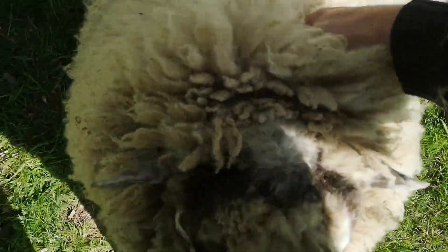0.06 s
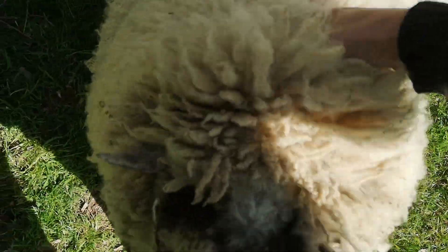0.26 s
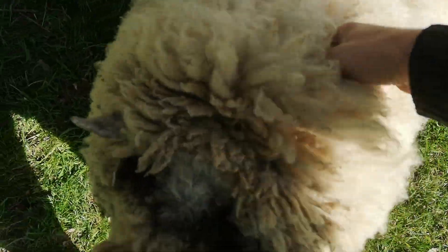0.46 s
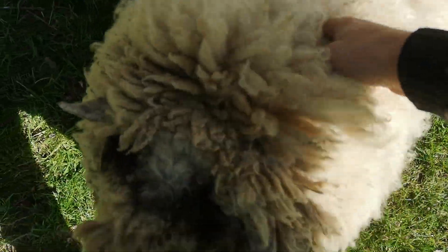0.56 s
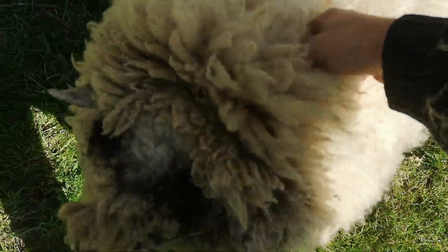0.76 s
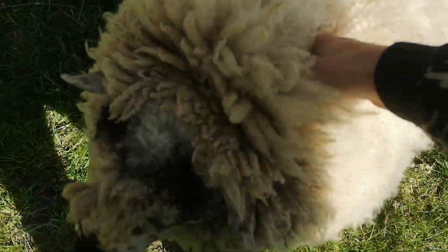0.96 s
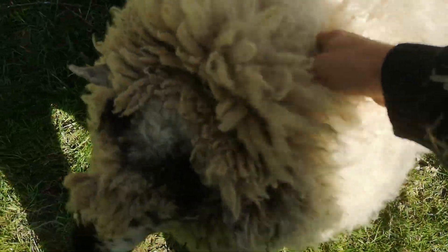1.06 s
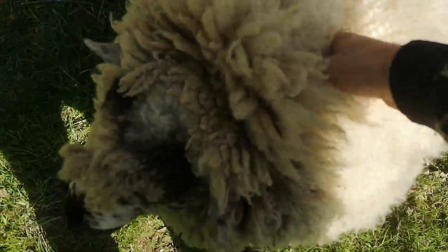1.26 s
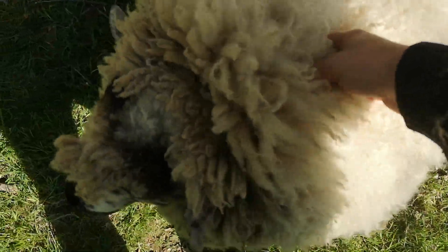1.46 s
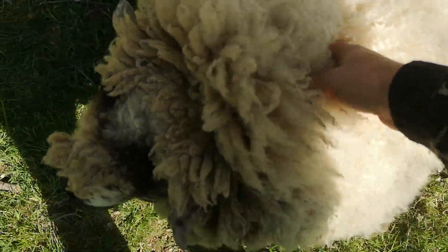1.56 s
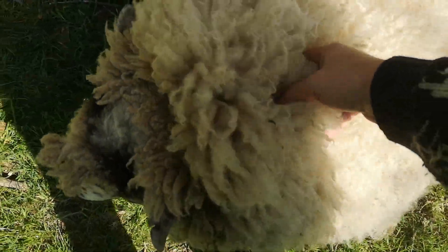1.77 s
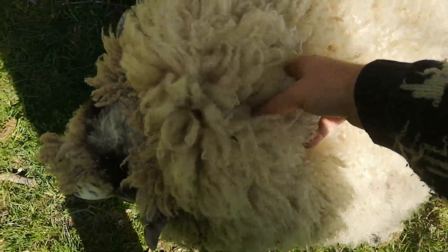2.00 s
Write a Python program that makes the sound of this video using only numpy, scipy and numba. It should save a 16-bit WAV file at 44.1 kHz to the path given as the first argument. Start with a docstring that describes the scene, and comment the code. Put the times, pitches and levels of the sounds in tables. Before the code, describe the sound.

A sheep close to the microphone gives one hoarse, fluttering bleat in the first second; afterwards a quiet open pasture with low wind rumble, faint wool rustle, tiny bird chirps and a dull bump near the end.

```python
"""Hoarse bleat of a held sheep

A sheep held by its fleece gives one hoarse, almost voiceless bleat close to the microphone: throbs of
noise and glottal pulses excite throat and mouth resonances. Shaped noise makes wind rumble, scuffs of
the hand, rustling wool and the faint pasture hiss; bumps are short pressure pulses with a noise shudder.
Gliding sines chirp as far birds, and a few thin high tones fade in near the end."""
import sys
import numpy as np
from scipy import signal
from scipy.fft import rfft, irfft
from scipy.io import wavfile
from scipy.ndimage import uniform_filter1d
from numba import njit

SR = 44100
rng = np.random.default_rng(int(sys.argv[2]) if len(sys.argv) > 2 else 0)


def dump(signal):
    """Clip the signal to [-1, 1] and save it as 16-bit WAV at the path in sys.argv[1]."""
    limited = np.clip(np.atleast_2d(signal).T, -1, 1)
    pcm = np.round(limited * 32767).astype(np.int16)
    wavfile.write(sys.argv[1], SR, pcm)


N = 89743


def undb(db):
    """Amplitude gain is 10 to the power of dB / 20."""
    return 10 ** (np.asarray(db) / 20)


def unit(x):
    """Normalization: division by the root mean square gives rms 1."""
    return x / np.sqrt(np.mean(x ** 2))


def curve(rows):
    """Linear interpolation joins (t/s, value) rows, holding the end values."""
    return np.interp(np.arange(N) / SR, *np.array(rows).T)


def colour(x, points):
    """Spectral shaping: the spectrum is weighted by (f/Hz, level/dB) points, then set to rms 1."""
    hz, db = np.array(points).T
    f = np.maximum(np.arange(N // 2 + 1) * SR / N, 1)
    gain = undb(np.interp(np.log(f), np.log(hz), db))
    low_cut = np.minimum(f / hz[0], 1) ** 2  # 12 dB per octave below the first point
    return unit(irfft(rfft(x) * gain * low_cut, N))


@njit
def svf(x, hz, width):
    """State-variable filter: two integrators in a loop form a band-pass with a moving centre."""
    y = np.empty(len(x))
    band, low = 0., 0.
    for i in range(len(x)):
        g = np.tan(np.pi * hz[i] / SR)
        damping = width / hz[i]
        v = (band + g * (x[i] - low)) / (1 + g * (g + damping))
        band = 2 * v - band
        low = low + 2 * g * v
        y[i] = damping * v
    return y


def resonate(x, hz, width):
    """Cascaded resonance: two equal band-passes steepen the skirts, at rms 1."""
    hz = hz * np.ones(N)
    once = svf(x, hz, float(width))
    return unit(svf(once, hz, float(width)))


def walk(rate):
    """Smoothed random steps, rate per second, give a slow fluctuation of rms 1."""
    k = int(SR / rate)
    steps = np.repeat(rng.standard_normal(N // k + 1), k)
    return unit(uniform_filter1d(steps, k)[:N])


def breath():
    """Amplitude envelopes: Gaussian throbs of effort, and their twice-smoothed sustained flow."""
    # throbs of the bleat: peak t/s, relative level/dB, half length/s
    throb_rows = [(0.09, -14.5, 0.014), (0.125, -12.5, 0.012), (0.168, -10.5, 0.0087), (0.203, -8, 0.013),
                  (.233, -2.5, 0.0062), (.297, 1, .015), (0.355, 1, 0.013), (0.417, -1.5, 0.026),
                  (0.487, -3, 0.018), (0.542, -1, 0.017), (0.608, 0.5, 0.017), (0.663, 0, .018),
                  (0.731, -5, 0.025), (0.804, -8, 0.023), (.865, -19, 0.021), (0.93, -16.5, 0.016)]
    sustain, smoothing_s = 0.48, 0.063
    t = np.arange(N) / SR
    throbs = sum(undb(db) * np.exp(-((t - s) / half) ** 2) for s, db, half in throb_rows)
    size = int(smoothing_s * SR)
    flow = uniform_filter1d(uniform_filter1d(throbs, size), size)
    return np.hypot(throbs, 2 * sustain * flow), flow


def glottis():
    """Glottal modulation: slack folds chop the air and add uneven pulses and a faint tone."""
    fold_hz, fold_jitter, voice_jitter = 197.9, 0.07, 0.035  # jitters are rms fractions of the pitch
    rasp = 0.23  # depth of the chopping
    phase = np.cumsum(fold_hz * (1 + fold_jitter * walk(150))) / SR
    gate = 1 + rasp * np.cos(2 * np.pi * phase)
    closures = np.diff(np.floor(phase), prepend=0)  # one pulse per cycle
    pulses = unit(closures * undb(2.1 * walk(200)))
    voice_phase = np.cumsum(fold_hz * (1 + voice_jitter * walk(40))) / SR
    return gate, pulses, np.sin(2 * np.pi * voice_phase)


def sheep():
    """Source-filter principle: chopped air and pulses ring throat and mouth, throb by throb."""
    # mouth opening: t/s, centre of the mouth resonance f/Hz
    mouth_rows = [(.08, 2140), (.2, 2330), (.3, 2400), (.43, 2420), (.54, 2570), (.66, 2770), (.76, 2900),
                  (.84, 2730), (.93, 2040)]
    # narrow upper resonances that the mouth picks out in turn: f/Hz, width/Hz, relative level/dB
    upper_rows = [(1963, 66, 1.5), (2130, 120, 4), (2318, 80, 2.5), (2530, 126, 4), (2683, 73, -8),
                  (2780, 48, 2), (2888, 45, -6), (3026, 120, -4.5), (3286, 120, -8.5), (3390, 250, -14)]
    # fixed throat resonances: f/Hz, width/Hz, relative level/dB
    throat_rows = [(520, 90, -13), (1210, 170, -10), (1620, 260, -13), (1970, 120, -10)]
    # broad rush of air: f/Hz, relative level per Hz/dB
    air_tone = [(200, -5.5), (400, 1.5), (900, -8), (1800, 2), (3000, -7), (3600, -9), (5000, -23.5),
                (8000, -35.5), (15000, -29)]
    bleat_db, throat_db, air_db, ring_db, pulse_db, voice_db = -51, -16, -11, 0.5, -15, -7
    throat_follow = 0.44  # throat and air follow effort by this power
    open_db_per_hz, open_hz = 0.0231, 2510  # the throat sounds louder as the mouth opens
    mouth_width_hz = 1010
    pan_db = 3.5  # left over right
    spread = 0.93  # share of the air noise power that is separate in each ear

    effort, flow = breath()
    gate, pulses, voice = glottis()
    shared, mouth = rng.standard_normal(N), curve(mouth_rows)
    ears = []
    for ear in range(2):
        noise = np.sqrt(1 - spread) * shared + np.sqrt(spread) * rng.standard_normal(N)
        air = gate * noise
        source = air + undb(pulse_db) * pulses
        rings = sum((-1) ** k * undb(db) * resonate(source, hz, w)  # alternate signs
                    for k, (hz, w, db) in enumerate(upper_rows))
        upper = undb(ring_db) * resonate(rings, mouth, mouth_width_hz)
        throat = unit(sum(undb(db) * resonate(source, hz, w) for hz, w, db in throat_rows))
        throat_gain = undb(throat_db + open_db_per_hz * (mouth - open_hz))
        body = throat_gain * throat + undb(air_db) * colour(air, air_tone)
        ears.append(effort * upper + effort ** throat_follow * body)
    pan = undb(np.array([[pan_db], [-pan_db]]) / 2)
    return undb(bleat_db) * (pan * np.array(ears) + undb(voice_db) * 2 * flow * voice)


def wind():
    """Turbulent pressure: gusts rumble alike at both ports, with separate lighter buffeting."""
    # gusts: t/s, relative level/dB
    gust_rows = [(0.0, -44.5), (0.11, -31), (0.25, -37.5), (0.28, -24.5), (0.32, -45), (0.7, -40.5),
                 (0.72, -30.5), (0.89, -32), (0.92, -37.5), (1.07, -50), (1.13, -35), (1.15, -50.5),
                 (1.27, -35.5), (1.45, -48), (1.5, -39.5), (1.78, -43), (1.92, -27.5), (2.03, -43)]
    # rumble spectrum: f/Hz, relative level per Hz/dB
    rumble_tone = [(15, -3), (43, 0.5), (75, -6), (100, -9.5), (135, -17.5), (190, -24.5), (260, -39),
                   (500, -79.5)]
    # spectrum of the buffeting at each port: f/Hz, relative level per Hz/dB
    buffet_tone = [(30, 4), (70, 3), (120, -15), (170, -6.5), (230, -10), (310, -17.5), (450, -32),
                   (900, -63)]
    rumble_db, buffet_db = 0.5, -35.5
    buffet_follow = 0.5  # buffeting follows the gusts by this power
    steady_s = 0.0379  # the rumble's own level is evened out over this time
    rumble = colour(rng.standard_normal(N), rumble_tone)
    rumble = rumble / np.sqrt(uniform_filter1d(rumble ** 2, int(steady_s * SR)))
    buffet = colour(rng.standard_normal((2, N)), buffet_tone)
    gust = curve(gust_rows)
    return undb(gust + rumble_db) * rumble + undb(buffet_follow * gust + buffet_db) * buffet


def bumps():
    """Impulse response: each bump is a push with its rebound and a dull shudder of the casing."""
    # soft bumps on the microphone: t/s, push level/dB, pitch f/Hz
    bump_rows = [(0.12, -30.5, 57.4), (0.265, -27.5, 72), (.279, -27, 98.4), (0.789, -25, 39),
                 (0.848, -19.5, 66.6), (0.878, -16.5, 41.7), (1.887, -24, 113.4), (1.908, -15, 88.5),
                 (1.971, -27, 127)]
    # shudder of the casing: f/Hz, relative level per Hz/dB
    body_tone = [(90, -25), (150, -3.5), (200, 0), (250, -10.5), (330, -18), (450, -40), (900, -82)]
    hard_hz = 91.4  # the shudder grows as (pitch / hard_hz) squared
    rise_s, decay_s = 0.006, 0.014
    shudder_db, side_db = -22, -0.5
    t, push, shudder = np.arange(N) / SR, 0, 0
    for s, db, hz in bump_rows:
        u = (np.pi * hz * (t - s)) ** 2
        push = push + undb(db) * (2 * u - 1) * np.exp(-u)
        envelope = np.exp(-np.abs(t - s) / np.where(t < s, rise_s, decay_s))
        shudder = shudder + undb(db) * (hz / hard_hz) ** 2 * envelope
    mid, side = colour(rng.standard_normal((2, N)), body_tone)
    casing = mid + undb(side_db) * side * np.array([[1], [-1]])
    return push + undb(shudder_db) * shudder * casing


def rubs():
    """Friction noise: the hand shifts now and then with a short dull scuff."""
    # rubs of the hand: t/s, half length/s, level/dB
    rub_rows = [(.008, 0.024, -54), (0.288, 0.018, -59), (0.346, 0.045, -64), (0.808, 0.062, -69)]
    # scuff spectrum: f/Hz, relative level per Hz/dB
    rub_tone = [(200, -7.5), (250, 1.5), (360, -4), (600, -10), (750, -23), (1500, -40.5), (4000, -54.5)]
    t = np.arange(N) / SR
    strokes = sum(undb(db) * np.exp(-((t - s) / half) ** 2) for s, half, db in rub_rows)
    return colour(rng.standard_normal(N), rub_tone) * strokes


def wool():
    """Friction of many fibres: random clicks within a soft hiss, with a few crackles."""
    # rustling wool: t/s, relative level/dB
    rustle_rows = [(0.0, -71.5), (0.04, -79.5), (0.14, -73), (0.25, -76.5), (0.35, -72), (0.44, -77.5),
                   (0.9, -74), (1.03, -79.5), (1.26, -77), (1.44, -82), (1.59, -74.5), (1.61, -80.5),
                   (2.0, -71.5), (2.02, -76.5)]
    # rustle spectrum: f/Hz, relative level per Hz/dB
    wool_tone = [(300, 1), (1000, 12), (2000, 13), (3500, 1), (5500, 0), (7500, -6.5), (9000, -12),
                 (15500, -15.5)]
    # crackles: t/s, level/dB
    crackle_rows = [(.178, -74), (0.359, -56)]
    rustle_db, fibre_db, crackle_s = 9.5, -6.5, 0.0013
    fibre_rate = 270  # mean clicks per second in each ear
    t = np.arange(N) / SR
    clicks = rng.random((2, N)) < fibre_rate / SR
    fibres = unit(clicks * rng.standard_normal((2, N)))
    rub = colour(rng.standard_normal((2, N)) + undb(fibre_db) * fibres, wool_tone)
    rustle = undb(curve(rustle_rows) + rustle_db + 0.8 * walk(24.46))
    snaps = sum(undb(db) * np.exp(-np.abs(t - s) / crackle_s) for s, db in crackle_rows)
    return rub * (rustle + snaps)


def birds():
    """Frequency modulation: tiny far chirps, each a whistle with a linear glide."""
    # chirps: t/s, half length/s, pitch at the peak f/Hz, glide/(Hz per s), level/dB
    chirp_rows = [(.178, .008, 5450, -20000, -77), (.207, 0.01, 4460, -16, -73),
                  (0.909, 0.018, 5800, -6000, -81), (0.925, 0.0073, 5900, -4, -93),
                  (1.23, .008, 5720, -12000, -77), (1.275, 0.013, 3540, -6000, -72),
                  (1.56, 0.018, 5600, -12000, -75)]
    t, out = np.arange(N) / SR, 0
    for s, half, hz, glide, db in chirp_rows:
        u = t - s
        cycles = hz * u + glide * u ** 2 / 2 + rng.random((2, 1))
        out = out + undb(db) * np.exp(-(u / half) ** 2) * np.sin(2 * np.pi * cycles)
    return out


def whine():
    """Additive synthesis: a few thin, slightly wavering high sines fade in."""
    # high tones: f/Hz, level/dB
    tone_rows = [(4700, -86), (5001, -92), (5410, -87), (5780, -88)]
    start_s, rise_s = 1.83, 0.13
    rise = np.clip((np.arange(N) / SR - start_s) / rise_s, 0, 1)
    tones = 0
    for hz, db in tone_rows:
        cycles = np.cumsum(hz * (1 + 0.002 * walk(38.6))) / SR + rng.random((2, 1))
        tones = tones + undb(db) * np.sin(2 * np.pi * cycles)
    return rise * tones


def pasture():
    """Diffuse field: a faint, wide hiss from noise common to both ears and noise opposed in them."""
    # common noise: f/Hz, relative level per Hz/dB
    mid_tone = [(200, -4), (300, -3), (420, -5), (560, -11), (800, -9), (1400, -6.5), (1800, -3),
                (2400, -13.5), (3330, -22.5), (5620, -34.5), (8320, -31.5), (15000, -33.5)]
    # opposed noise: f/Hz, relative level per Hz/dB
    side_tone = [(200, -35.5), (330, -27.5), (450, -11), (600, -8), (950, -4.5), (1490, -19.5),
                 (2650, -16.5), (4290, -36.5), (5510, -32), (8100, -36.5), (15000, -39)]
    mid_db, side_db = -69.5, -68.5
    mid = undb(mid_db + 0.37 * walk(9.1)) * colour(rng.standard_normal(N), mid_tone)
    side = undb(side_db + 0.41 * walk(2.7)) * colour(rng.standard_normal(N), side_tone)
    return mid + side * np.array([[1], [-1]])


def scene():
    """Superposition: the bleat among handling, wind and pasture; rumble and bumps lag at the right."""
    port_lag_s = 0.00063
    t = np.arange(N) / SR
    left, right = wind() + bumps()
    handling = np.array([left, np.interp(t - port_lag_s, t, right)]) + rubs()
    return sheep() + handling + wool() + birds() + whine() + pasture()


def record(dry):
    """Band limiting: a 4 ms opening fade, then a steep elliptic low-pass cuts the top."""
    top_hz = 15700
    opening = np.minimum(np.arange(N) / SR / 0.004, 1)
    low_pass = signal.ellip(10, 0.2, 80, top_hz, fs=SR, output="sos")
    return signal.sosfilt(low_pass, dry * opening)


dry = scene()
out = record(dry)
dump(out)
```